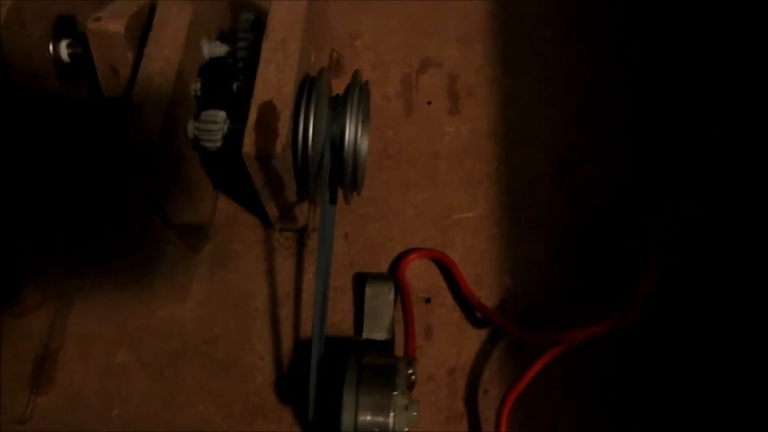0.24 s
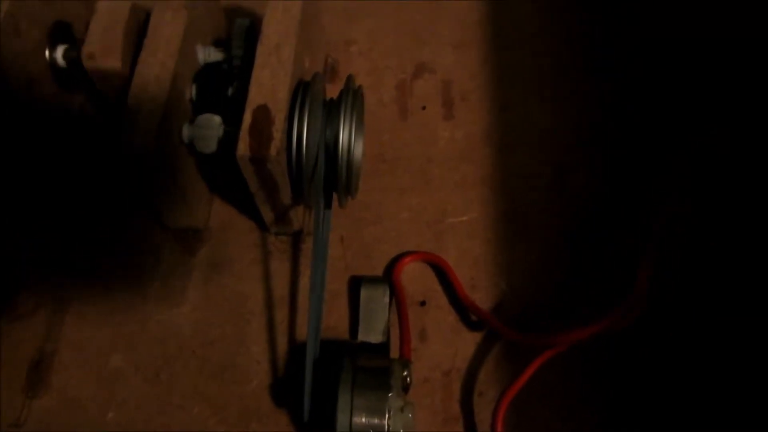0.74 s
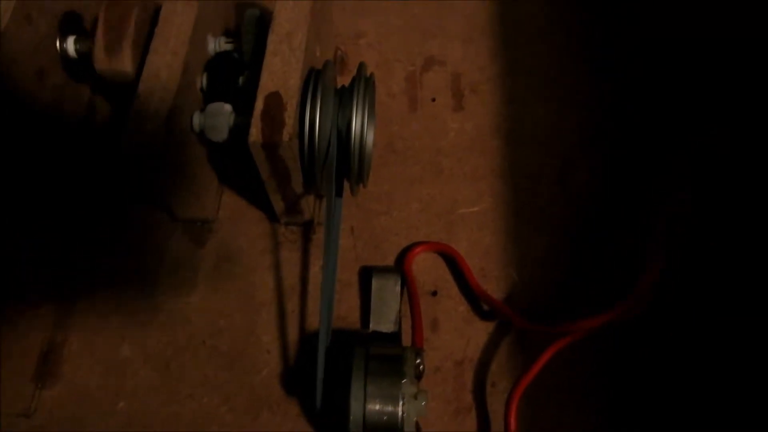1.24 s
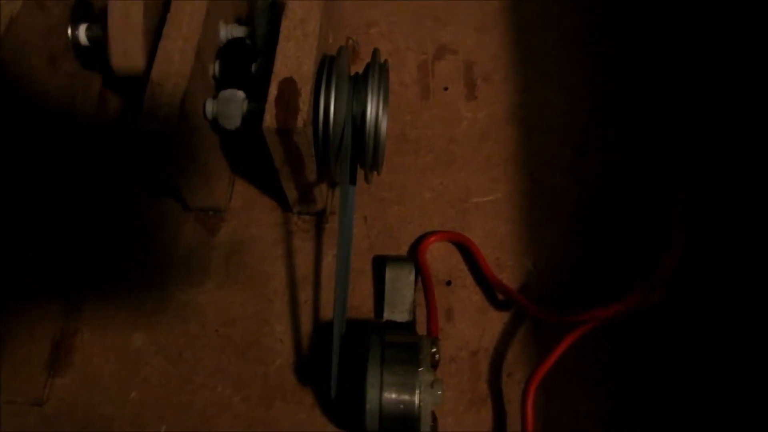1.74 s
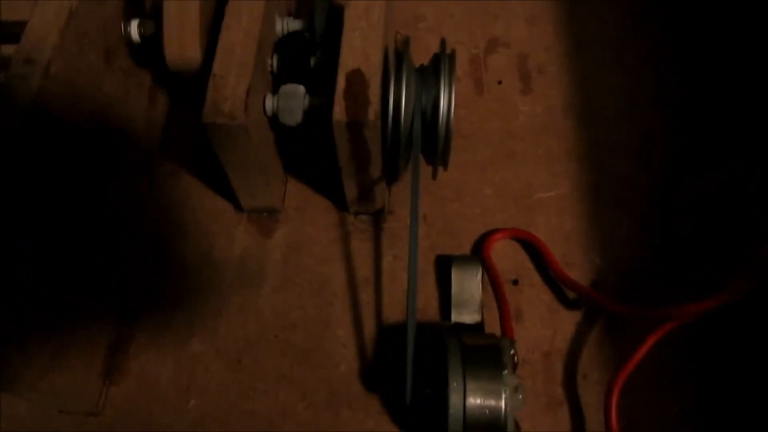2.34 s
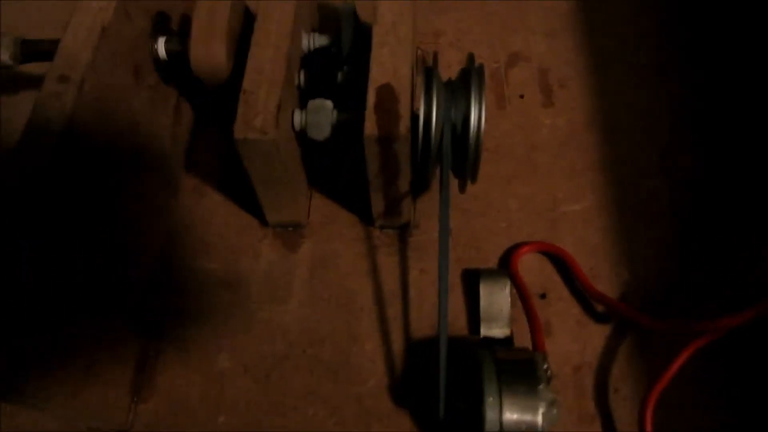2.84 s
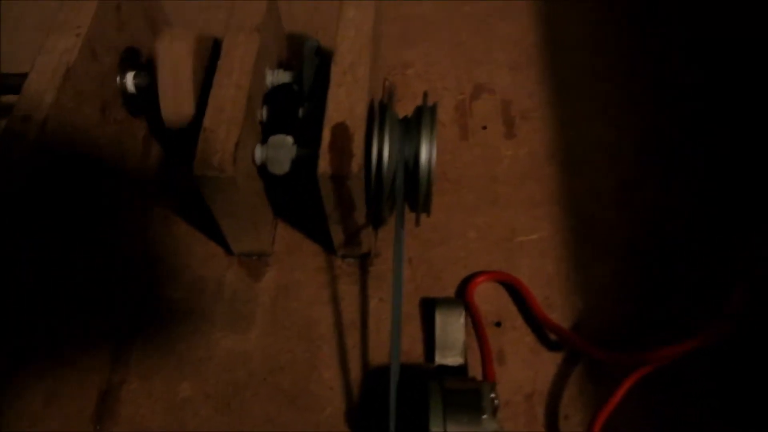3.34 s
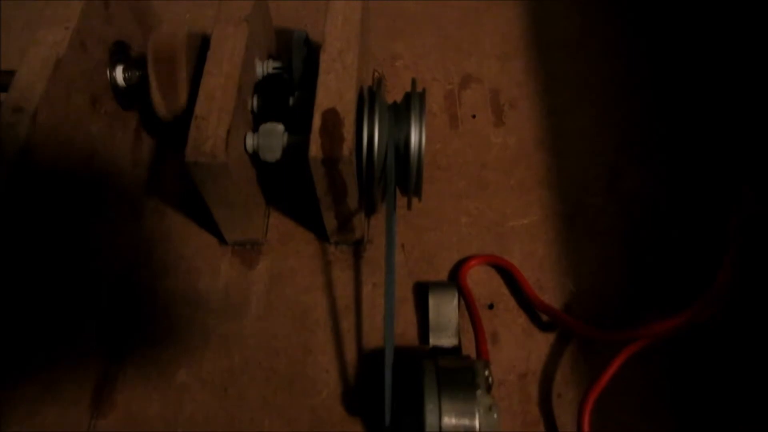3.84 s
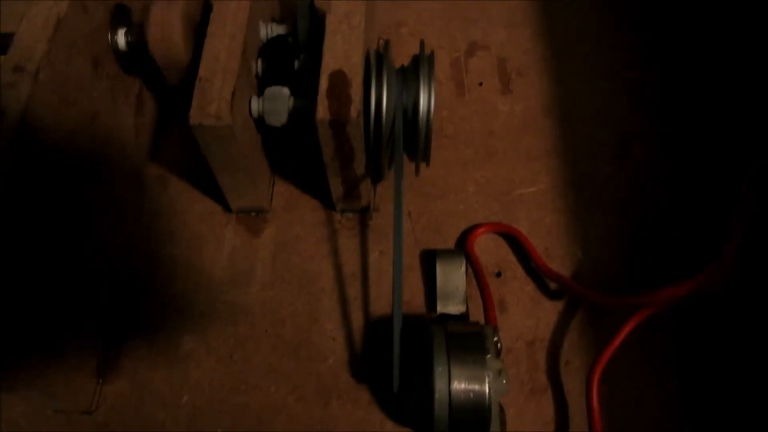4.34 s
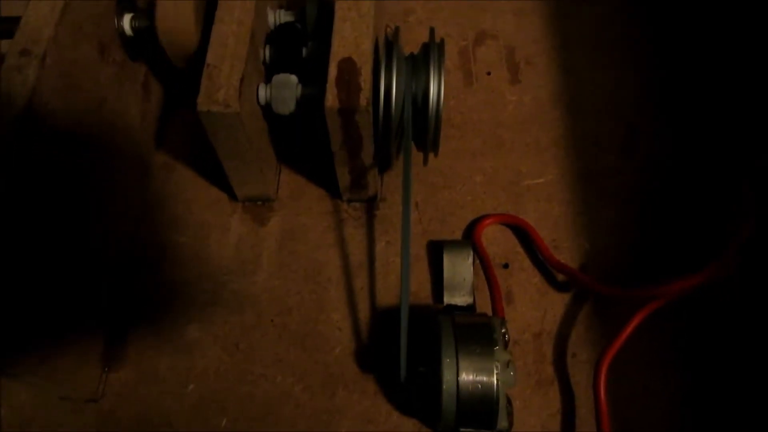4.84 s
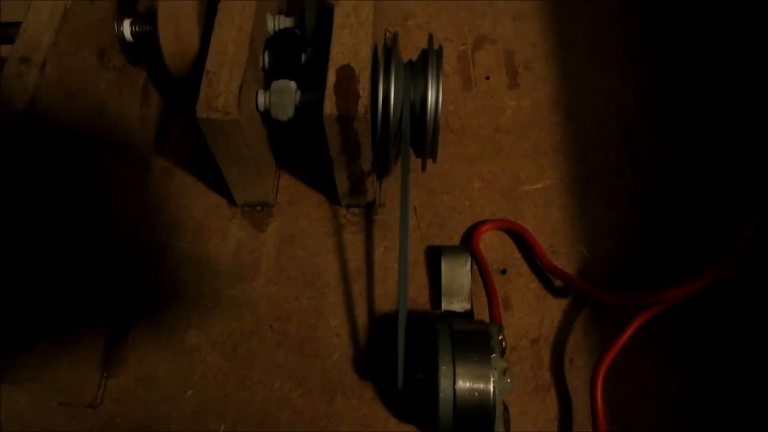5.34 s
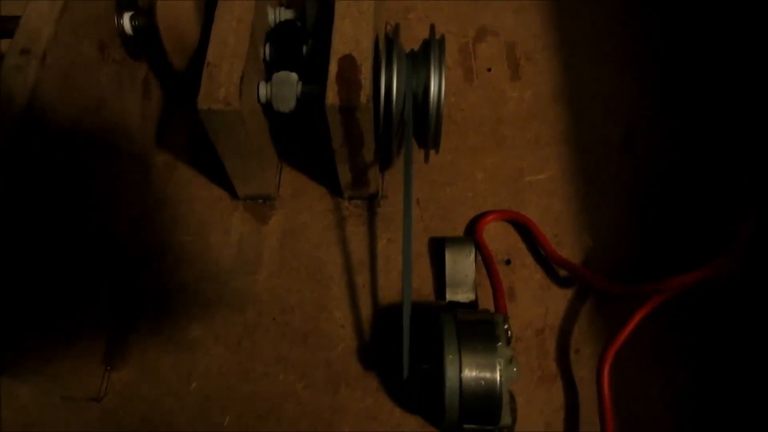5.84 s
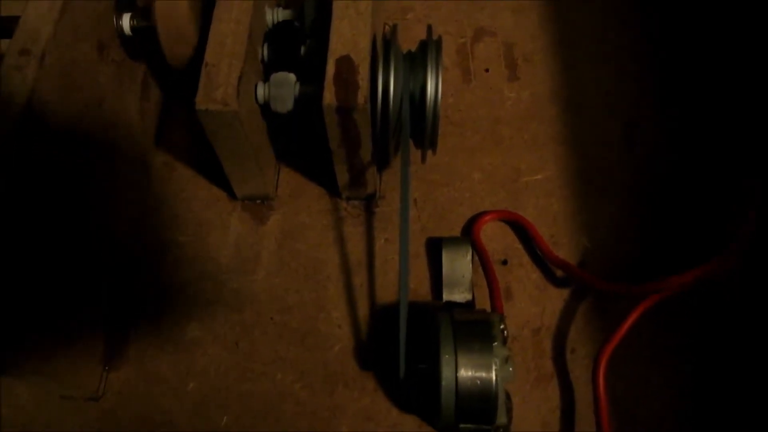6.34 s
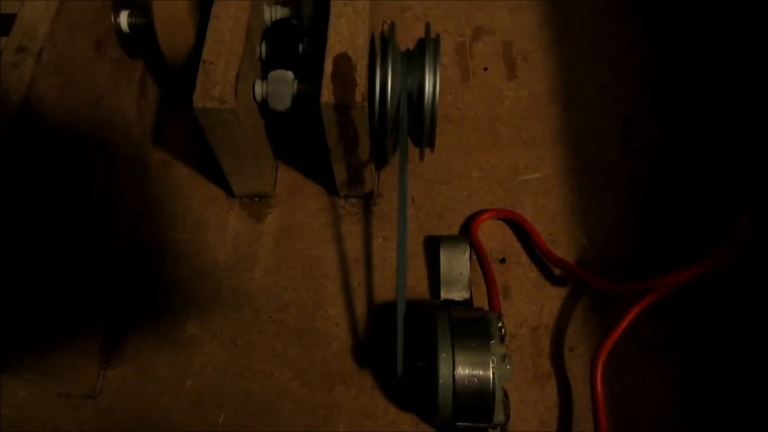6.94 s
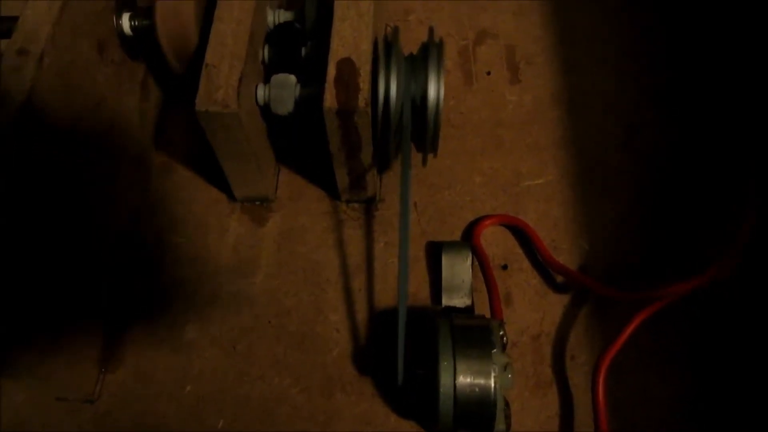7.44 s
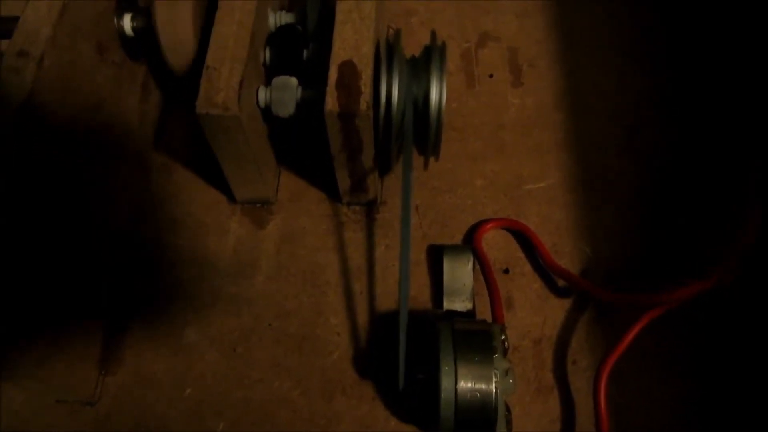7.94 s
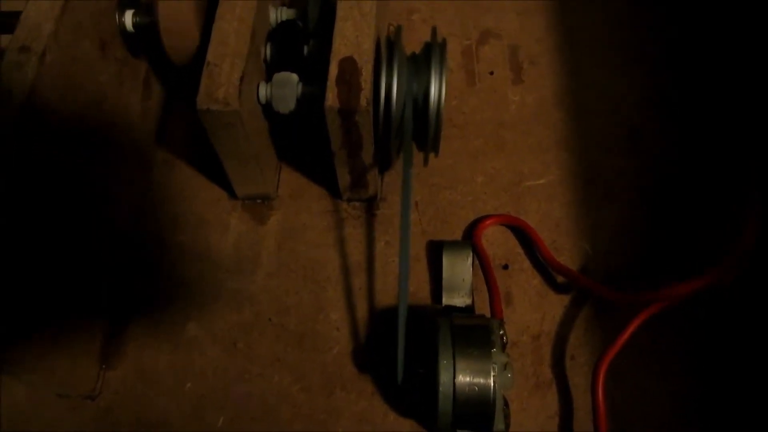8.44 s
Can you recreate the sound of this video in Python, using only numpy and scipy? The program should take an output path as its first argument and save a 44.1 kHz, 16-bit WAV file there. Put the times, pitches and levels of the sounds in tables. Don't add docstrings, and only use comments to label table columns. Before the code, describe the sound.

Close stereo microphone with audible hiss. A thin, wavering high controller whine and a light panel tap come first. At about half a second a small motor starts in jerky knocks, then accelerates without stopping. A wooden board rumbles and buzzes in the midrange, a jar bumps on its rollers, and loose metal ticks with every belt lap, growing into a dense, steady rattling roar that is still running at the end.

```python
import sys
import numpy as np
from scipy import signal
from scipy.fft import rfft, irfft
from scipy.io import wavfile
from scipy.ndimage import uniform_filter1d

SR = 44100
rng = np.random.default_rng(int(sys.argv[2]) if len(sys.argv) > 2 else 0)


def to_wav(s):
    ch = np.atleast_2d(s).T
    pcm = np.round(np.clip(ch, -1, 1) * 32767)
    wavfile.write(sys.argv[1], SR, pcm.astype(np.int16))


def attenuation_scalar(level_db):
    decades = np.asarray(level_db, float) / 20
    return 10 ** decades


N = 383229
T = np.arange(N) / SR

# start_s, peak_db, bright_db
KICKS = [(0.5372, -53, -61), (0.5534, -14, -56), (0.583, -12, -38), (0.6125, -15.5, -57),
         (0.6386, -20, -54), (0.664, -8, -40), (0.7065, -8.5, -39), (0.744, -15, -54), (0.7661, -13, -51),
         (0.8124, -13, -33), (0.8257, -11, -32), (0.88, -17, -47), (0.9014, -20, -40), (0.9284, -26, -52),
         (0.944, -7, -49), (0.9854, -1.5, -35), (1.0057, -12, -33), (1.0431, -23, -52), (1.0755, -16, -49),
         (1.089, -10, -52)]
# start_s, peak_db
KNOCKS = [(1.3393, -8), (1.395, -10), (1.4144, -7.5), (1.5476, -11), (1.6561, -10.5), (1.8666, -17),
          (1.913, -15), (1.9774, -8.5), (2.042, -7), (2.0699, -10), (2.2557, -15), (2.3296, -12.5),
          (2.45, -11), (2.5551, -11), (2.5956, -8), (2.6409, -7), (2.717, -8), (2.802, -12), (2.8654, -10),
          (2.9167, -10), (3.0265, -13), (3.0923, -6), (3.1333, -8), (3.3147, -12), (3.5065, -5),
          (3.5398, -4.5), (3.705, -9), (3.7289, -15), (3.7514, -8), (3.7908, -9), (3.8382, -8), (3.893, -4),
          (3.9339, -3), (3.9993, -5), (4.114, -5), (4.2028, -3), (4.309, -8), (4.3854, -8), (4.4692, -4),
          (4.512, -6), (4.5934, -5.5), (4.7326, -7), (4.79, -8), (4.9491, -9), (5.0704, -7), (5.228, -8),
          (5.342, -9), (5.6745, -8), (5.7299, -8), (5.7713, -8), (6.0831, -8), (6.8204, -9), (7.0527, -7),
          (7.196, -8), (7.3432, -5), (7.5313, -4)]
# start_s, roughness (1 = usual)
LAPS = [(0.72, 0.5), (1.492, 0.46), (2.1, 0.55), (2.677, 0.51), (3.17, 0.45), (3.592, 1.36), (3.974, 1.06),
        (4.282, 0.85), (4.57, 1.26), (4.849, 1), (5.129, 1.4), (5.396, 1.1), (5.641, 1.23), (5.874, 1.15),
        (6.107, 1.08), (6.333, 1.3), (6.551, 1.2), (6.763, 0.91), (6.972, 1.4), (7.169, 0.95), (7.365, 0.9),
        (7.552, 0.4), (7.738, 0.7), (7.9235, 0.6), (8.1085, 1.1), (8.2927, 0.8), (8.4767, 0.69),
        (8.6605, 0.79), (8.844, 1)]
# freq_hz, width_hz, level_db, left_right_db
BOARD = [(440, 36, -35, -.5), (550, 39, -5.5, -0.5), (586.4, 31, -0.5, 0), (612, 28.2, 5.5, 1),
         (714, 46, -2.5, -8)]
# freq_hz, width_hz, level_db, left_right_db
FRAME = [(851, 30, 0.5, 0.35), (999, 110, 0.5, 0.45), (1048.4, 39, 0, 0.33), (1192, 80, -1, 0.44),
         (1336, 79, 4.5, 0.83), (1558, 35, -3.5, 1)]
# freq_hz, width_hz, level_db, left_right_db
BRACKET = [(1765, 100, -0.5, 3), (1915, 120, -3, 1.5), (2218, 60, -9.5, 2.3), (2414, 107, -11.5, 1.7),
           (2534, 40, -17, 1.8), (2680, 36, -11.5, 1.1), (2910, 230, -10, 0.7), (3310, 61, -18.5, 0.65)]
# freq_hz, width_hz, level_db, left_right_db
HOUSING = [(1390, 42, -2.5, 1), (1481, 56, -3.5, 1), (1933, 110, -12, 1), (2950, 200, -19.5, 1),
           (3265, 80, -14, 1)]
# freq_hz, width_hz, level_db, left_right_db
METAL = [(8960, 460, -2.5, -4), (9430, 420, -4.5, -8.5), (10060, 490, -1, -10), (10640, 1700, -2.5, -5),
         (12100, 1200, -11, -6)]
# freq_hz, width_hz, level_db, left_right_db
SHELL = [(3940, 360, -2.5, -0.51), (5130, 440, -5.5, -1.1), (5914, 370, -2.5, -0.51),
         (6230, 380, 0.5, 0.63), (6700, 610, -3.5, -0.67), (7540, 1400, -6.5, -2)]
# freq_hz, width_hz, level_db, left_right_db
BRUSHES = [(8560, 1800, -3, 1), (9940, 130, -3, -6), (10920, 500, 4.5, -4), (12240, 600, 0.5, -18),
           (12900, 300, -5, -10), (13500, 200, -4.5, -9), (14700, 1200, -17, -1)]

PLACES, TURNS_PER_LAP = 4320, 24
ROTOR_EASES_SPEED = 50


def rms_one(x):
    return x / np.sqrt(np.mean(x ** 2) + 1e-20)


def in_time(rows, before_db=None):
    s, *columns = np.transpose(rows)
    return [np.interp(T, s, column, left=before_db) for column in columns]


def drift(rate_hz):
    r = np.exp(-2 * np.pi * rate_hz / SR)
    warm_up = 20000
    noise = rng.standard_normal(N + warm_up)
    return rms_one(signal.lfilter([1], [1, -2 * r, r * r], noise)[warm_up:])


def butterworth(x, order, hz, kind="low"):
    return signal.sosfilt(signal.butter(order, hz, kind, fs=SR, output="sos"), x)


def resonate(x, hz, width_hz):
    r = np.exp(-np.pi * width_hz / SR)
    w = 2 * np.pi * min(hz, .45 * SR) / SR
    return signal.lfilter([0, np.sin(w)], [1, -2 * r * np.cos(w), r * r], x + 1e-18)


def scatter(spread_db):
    strength_db = spread_db * np.minimum(rng.exponential(1, N), 4)
    return attenuation_scalar(strength_db) * rng.choice([-1, 1], N)


def shaft_marks(turns, count):
    return np.diff(np.floor(count * turns), prepend=0) > 0


def contacts(turns, count, per_s):
    return shaft_marks(turns, count), rng.random(N) < per_s / SR, np.arange(N), N


def lap_position():
    s = np.transpose(LAPS)[0]
    return np.interp(T, s, np.arange(len(s)))


def lap_contacts(turns, count, rolling):
    handover_s = 3.17
    lap, handover = lap_position(), round(handover_s * SR)
    by_shaft = lap[handover] + (turns - turns[handover]) / TURNS_PER_LAP
    place = np.floor(PLACES * np.where(T < handover_s, by_shaft, lap)).astype(int)
    new = np.diff(place, prepend=place[0]) > 0
    uneven = rng.random(PLACES) < rolling * TURNS_PER_LAP / PLACES
    even = place % (PLACES // (count * TURNS_PER_LAP)) == 0
    return new & even, new & uneven[place % PLACES], place, PLACES


def lap_swing(speed):
    # lap_share, rattle_db, casing_db, bracket_db, board_db
    spots = [(-.21, 3.5, 4, 4, 2), (-.1, 3, 2, 4.5, 3.5), (0, 0, 1, 1.5, -0.5), (.11, 4, 2, 4.5, 1.5),
             (.28, -2, 1, 0, -2.5), (.42, 0, 0.5, -1, 0)]
    # lap_share, rattle_db, casing_db, bracket_db, board_db
    flaps = [(.25, 0, 0, 4.9, 2.1), (.49, 0, -4, 1.1, 6.3)]
    full_speed, blur_speed = 126., 100
    rise = .5
    lap, swing_db = lap_position(), 0
    roughness, = in_time(LAPS)
    flapping = np.clip((speed - full_speed) / 3, 0, 1)
    width = .024 + .0008 * np.maximum(speed - blur_speed, 0)
    for places, size in (spots, roughness), (flaps, flapping):
        for share, *lift_db in places:
            past = ((lap - share + .5) % 1 - .5) / width + rise
            near = np.exp(-.5 * (past / np.where(past < 0, rise, 2 - rise)) ** 2)
            swing_db = swing_db + np.c_[lift_db] * size * (near - width * np.sqrt(2 * np.pi))
    return swing_db


def body(modes, marks, rate, kick_db, spread_db, apart_db, steady=0., lag=0):
    regular, rolling, place, places = marks
    at = np.flatnonzero(regular | rolling)
    swell = attenuation_scalar(1.36 * drift(74)) / np.sqrt(rate)
    wear = attenuation_scalar(rng.normal(0, 2., len(at)))
    touch = ((attenuation_scalar(kick_db) * regular + rolling) * swell)[at] * wear
    even = (steady * attenuation_scalar(kick_db) * regular / np.sqrt(rate))[at]
    luck, out = scatter(spread_db), np.zeros((2, N))
    for hz, width_hz, level_db, pan_db in modes:
        one, other = [touch * luck[(place[at] + shift) % places] for shift in rng.integers(0, N, 2)]
        clicks = np.zeros((2, N))
        clicks[:, at] = one + even, attenuation_scalar(apart_db) * other
        mid, side = attenuation_scalar(level_db) * np.sqrt(width_hz) * resonate(clicks, hz, width_hz)
        out[0] += attenuation_scalar(pan_db / 2) * (np.roll(mid, lag) + side)
        out[1] += attenuation_scalar(-pan_db / 2) * (mid - side)
    return rms_one(out)


def blows(events, modes, boost_db, contact_s):
    at, out = [round(event[0] * SR) for event in events], np.zeros((2, N))
    peak_db = np.array(events)[:, 1]
    luck_db = rng.normal(0, 1.4, (len(at), len(modes)))
    grit = rng.standard_normal(N)
    fade = np.exp(-1 / (max(contact_s, 1e-5) * SR))
    for k, (hz, width_hz, level_db, pan_db) in enumerate(modes):
        clicks = np.full(N, 1e-18)
        clicks[at] = attenuation_scalar(peak_db + level_db + boost_db + luck_db[:, k])
        envelope = signal.lfilter([np.sqrt(1 - fade ** 2)], [1, -fade], clicks)
        force = envelope * np.roll(grit, 997 * k) + 0.63 * (-1) ** k * clicks
        out += resonate(force, hz, width_hz) * attenuation_scalar([[pan_db / 2], [-pan_db / 2]])
    return out


def wood(turns, speed, effort_db, bracket_swing_db, board_swing_db):
    # freq_hz, width_hz, level_db, left_right_db
    apron_modes = [(322, 38, 0, 0)]
    marks, rate = lap_contacts(turns, count=6, rolling=8), 14 * speed
    asleep = np.clip(1 - speed / 42, 0, 1)
    tuned = np.exp(-((speed - 103) / 26) ** 2)
    settled = np.clip(speed - 124.5, 0, 1)
    board_db = effort_db - 5.5 - 14 * asleep + 2.5 * tuned - 1.8 * settled + board_swing_db
    waking_db = np.interp(T, [.9, 1.3], [-10, 0])
    frame_db = effort_db - 1.5 + waking_db
    bracket_db = effort_db - 12 + 0.0416 * speed + bracket_swing_db + waking_db
    apron_db = effort_db + waking_db - 32.5 - 0.0081 * speed + board_swing_db
    rumble = attenuation_scalar(board_db) * body(BOARD, marks, rate, 0., 2.15, -18)
    rumble += attenuation_scalar(frame_db) * body(FRAME, marks, rate, 0., 1.3, -13.5)
    rumble += attenuation_scalar(bracket_db) * body(BRACKET, marks, rate, 0.81, 4.0, -17.0)
    rumble += rotor(turns, speed, effort_db)
    thin = butterworth(rumble + wood_hits(), 10, 465, "high")
    apron = attenuation_scalar(apron_db) * body(apron_modes, marks, rate, 0., 4.9, -19)
    return butterworth(thin, 3, 3700) + butterworth(apron, 2, [280, 370], "band")


def rotor(turns, speed, effort_db):
    easing_db = 0.03 * np.maximum(speed - ROTOR_EASES_SPEED, 0)
    level_db = np.minimum(effort_db - 0.2, -27.5) - easing_db
    marks = lap_contacts(turns, count=6, rolling=30)
    housing = attenuation_scalar(level_db) * body(HOUSING, marks, 36 * speed, 6., 0.4, -14.5)
    return housing + squeal(shaft_marks(turns, 6) / np.sqrt(speed))


def squeal(kicks):
    lines = sum(resonate(resonate(kicks, hz, 180), hz, 180) for hz in (2960, 3260))
    fading_db = np.interp(T, [1.2, 2, 5.5, 7], [-14, 5.5, 3.5, -9])
    return attenuation_scalar(-47 + fading_db + 1.8 * drift(5)) * rms_one(lines)


def wood_hits():
    # start_s, peak_db
    seam_thumps = [(1.7, -21), (1.955, -21), (2.583, -19), (2.637, -14), (2.75, -12.5), (2.955, -21),
                   (3.03, -16), (3.152, -10.5), (3.192, -15), (3.475, -16), (3.536, -16), (3.624, -13),
                   (3.948, -15), (4.095, -11), (4.188, -13.5), (4.221, -9.5), (4.281, -11), (4.408, -14),
                   (4.482, -15), (4.512, -9), (4.559, -10), (4.598, -14), (4.654, -16), (4.706, -13),
                   (4.735, -14), (4.819, -14), (4.986, -14), (5.043, -14), (5.099, -11), (5.291, -14),
                   (5.376, -12), (5.455, -10), (5.612, -7), (5.662, -9), (5.734, -15), (5.848, -10),
                   (5.895, -8), (6.082, -12), (6.127, -13), (6.309, -10), (6.351, -12), (6.462, -15),
                   (6.527, -11), (6.568, -14), (6.622, -18), (6.676, -14), (6.741, -10), (6.885, -14),
                   (6.925, -13), (7.025, -11), (7.135, -8.5), (7.191, -17), (7.285, -11), (7.324, -13),
                   (7.51, -12), (7.619, -16)]
    # start_s, peak_db
    clanks = [(1.4142, -9), (2.0417, -6), (2.75, -15), (3.54, -10), (6.9376, -8), (7.5327, -7)]
    bumps = [(s, db - min(s, 5)) for s, db in KNOCKS]
    hits = butterworth(blows(seam_thumps, BOARD[1:4], -9., 0.0031), 3, 900)
    hits += blows(KICKS, HOUSING, -16.5, 0.0039)
    hits += blows(clanks, BRACKET[:2], -3.0, .002)
    return hits + blows(bumps, FRAME[1:5] + BRACKET[:6:2], -7.5, 0.0007)


def metal(turns, speed, effort_db, rattle_swing_db, casing_swing_db):
    rattle_db = -45 + 0.96 * (effort_db + 18)
    casing_db = np.minimum(effort_db - 25, -53.5 + 0.06 * speed)
    casing_db = casing_db + 5 + 0.53 * (rattle_db + 47.5) + casing_swing_db
    brush_db = np.minimum(effort_db - 24.5, -46 - 0.1 * np.abs(speed - ROTOR_EASES_SPEED))
    rate = 60 * speed
    marks = contacts(turns, count=1, per_s=rate)
    rattle = attenuation_scalar(rattle_db + rattle_swing_db) * body(METAL, marks, rate, 12.0, 4.2, -4.0, lag=1)
    casing = attenuation_scalar(casing_db) * body(SHELL, marks, rate, 10.8, 2.6, -26)
    brushes = attenuation_scalar(brush_db) * body(BRUSHES, marks, rate, 3., .8, -0.72)
    return butterworth(rattle + casing + brushes + metal_hits(), 2, 3600, "high")


def metal_hits():
    # start_s, peak_db, casing_db
    ticks = [(3.4924, -30, -30), (3.5383, -32, -39), (3.7009, -34, -37), (3.882, -32, -35),
             (3.9623, -26, -40), (4.0591, -30, -34), (4.2172, -25, -33), (4.2771, -27, -40),
             (4.3609, -28, -36), (4.5091, -27, -36), (4.567, -27, -37), (4.5989, -25, -37),
             (4.7396, -34, -39), (4.7884, -27, -36), (4.8448, -28, -40), (4.8772, -26, -38),
             (4.9097, -33, -36), (4.9256, -31, -35), (5.0688, -25, -31), (5.1252, -30, -38),
             (5.1576, -27, -40), (5.205, -29, -31), (5.3402, -25, -33), (5.3916, -30, -40),
             (5.4205, -24, -40), (5.5452, -33, -39), (5.5881, -27, -37), (5.636, -26, -41),
             (5.664, -24, -36), (5.7049, -29, -33), (5.8241, -29, -37), (5.871, -28, -42),
             (5.8984, -28, -42), (6.0566, -28, -36), (6.103, -30, -44), (6.1304, -29, -42),
             (6.329, -26, -39), (6.3549, -28, -37), (6.4971, -32, -38), (6.5465, -28, -42),
             (6.5659, -31, -38), (6.6088, -32, -38), (6.7595, -26, -40), (6.7844, -30, -39),
             (6.9251, -30, -36), (6.9665, -27, -37), (6.9909, -27, -37), (7.1261, -27, -33),
             (7.1895, -29, -36), (7.3212, -26, -35), (7.3826, -28, -38), (7.4963, -28, -36),
             (7.5522, -30, -35), (7.7382, -31, -42), (7.8106, -30, -39), (7.8814, -30, -39),
             (8.0665, -29, -37), (8.2506, -29, -37), (8.4736, -30, -39), (8.504, -28, -33)]
    hits = blows([(s, peak_db) for s, peak_db, casing_db in ticks], METAL[:4], -3.5, 0.00066)
    hits += blows([(s, casing_db) for s, peak_db, casing_db in ticks], SHELL[2:5], 3.6, 0.0009)
    hits += blows([(s, bright_db) for s, peak_db, bright_db in KICKS], METAL + BRUSHES[4:], 1.5, .003)
    return hits + blows(KNOCKS, SHELL[2:4], -22.5, .0015)


def table_hum(turns, speed, effort_db, casing_swing_db, duck_db):
    # freq_hz, width_hz, level_db, left_right_db
    table_modes = [(106, 9, -12, 0), (143, 13, 0, -1), (205, 12, -8, 0)]
    # start_s, end_s, level_db
    spells = [
        (0.502, 1.1, -5.5),
        (2.0, 2.248, 2),
        (2.497, 2.75, 3.5),
        (4.17, 5.7, 1),
        (5.75, 6.9, -6),
        (7.6, 8.69, -3.5),
    ]
    spells_db = sum(db * (T > start) * (T < end) for start, end, db in spells)
    hum_db = -56.5 + .5 * (effort_db + 20) + 0.3 * duck_db + uniform_filter1d(spells_db, size=3000)
    marks = lap_contacts(turns, count=1, rolling=20)
    hum = attenuation_scalar(hum_db + 1) * body(table_modes, marks, 21 * speed, 7, .6, -9, steady=.5)
    legs = sum(rms_one(resonate(rng.standard_normal(N), hz, 9)) for hz in (104, 208))
    hum += attenuation_scalar(-62 + casing_swing_db) * np.clip(5 * (T - 6.9), 0, 1) * legs
    return butterworth(hum, 2, [90, 230], "band")


def steps():
    # start_s, first_hz, last_hz, level_db
    hunting = [(.0, 7210, 6884, -65), (.145, 7172, 7240, -58), (.215, 7194, 6980, -60),
               (.255, 6990, 7160, -64), (.3, 7200, 7300, -90), (.34, 7310, 7240, -60),
               (.42, 7230, 7142, -48), (.508, 6704, 6708, -53), (.575, 6570, 6390, -53),
               (.705, 6500, 6560, -50), (.81, 6900, 6900, -48), (.838, 6480, 6452, -51)]
    # start_s, first_hz, last_hz, level_db, wobble_rad
    loaded = [(.9, 6800, 6750, -50, 2), (.955, 6830, 6790, -48, 2.1), (1.09, 6715, 6598, -48, 1.2),
              (1.3, 6662, 6600, -45, 1), (1.42, 6482, 6510, -44.5, .45), (1.56, 6430, 6345, -50, 1.6),
              (1.76, 6336, 6326, -47, .4), (1.99, 6426, 6486, -43.5, .5), (2.35, 6486, 6440, -43.5, .5),
              (2.55, 6430, 6401, -45.5, .9), (2.76, 6403, 6413, -46.5, .9), (2.99, 6390, 6274, -41.5, .4),
              (3.18, 6286, 6228, -44, .2), (3.36, 6228, 6266, -45.5, .2), (3.52, 6252, 6272, -51, .6),
              (3.66, 6122, 6260, -90, 0), (4.51, 6380, 6354, -46.5, .2), (4.77, 6295, 6275, -46.5, .2),
              (5.16, 6240, 6260, -55, .2), (5.3, 6204, 6204, -99, 0)]
    half_step_s = .01
    rows = [(*row, 0) for row in hunting] + loaded
    ends = [row[0] for row in rows[1:]] + [T[-1]]
    points = []
    for (start, first, last, db, rad), end in zip(rows, ends):
        points.append((start + half_step_s, first, db, rad))
        points.append((end - half_step_s, last, db, rad))
    return in_time(points)


def whine(turns):
    hz, level_db, wobble_rad = steps()
    octave_db = -52 - .017 * np.abs(hz - 6380) + .45 * (level_db + 47)
    octave_db = octave_db - 60 * (T > 3.67)
    phase = 2 * np.pi * np.cumsum(np.abs(hz) + 8 * drift(25)) / SR
    bend = wobble_rad * np.sin(2 * np.pi * 3 * turns)
    gap_db = np.maximum(np.abs(np.gradient(hz)) * SR - 7000, 0) / 300
    tone_level = attenuation_scalar(level_db - gap_db + 1.5 + 1.0 * drift(30))
    octave_level = attenuation_scalar(octave_db - gap_db + 2.5 + 2.2 * drift(12))
    tone = tone_level * np.sin(phase + bend) * attenuation_scalar([[-.5], [.5]])
    octave = octave_level * np.sin(2 * phase + .5 * bend + [[.8], [0]]) * attenuation_scalar([[-7], [0]])
    return np.sqrt(2) * (tone + octave)


def hand():
    # start_s, peak_db
    taps = [
        (0.160, -33.5),
        (0.419, -46),
    ]
    # freq_hz, width_hz, level_db, left_right_db
    panel = [(619, 60, -1, 0), (958, 50, -8, 0), (1184, 60, -2, 0), (1410, 63, 0, 0), (1750, 80, -9, 0)]
    dull_table = [(270, 90, 0, 0), (170, 70, -2, 0)]
    return blows(taps[:1], panel, -4.0, .006) + blows(taps[1:], dull_table, 0., .004)


def hiss():
    # freq_hz, density_db (per Hz)
    spectrum = [(20, -14), (50, -29), (90, -19.5), (400, -21), (1300, -18.5), (5300, -29), (12900, -34),
                (14800, -34)]
    hz, level_db = np.transpose(spectrum)
    bins_hz = np.arange(N // 2 + 1) * SR / N
    shape = attenuation_scalar(np.interp(np.log(bins_hz + 1), np.log(hz), level_db))
    mid, side = irfft(rfft(rng.standard_normal((2, N))) * shape, N)
    noise = attenuation_scalar(-49) * rms_one(mid) + attenuation_scalar(-42) * rms_one(side) * [[1], [-1]]
    noise += attenuation_scalar(np.interp(T, [0, 4, 6], [-56, -57, -62])) * drift(37)
    return noise + np.sqrt(2) * attenuation_scalar([[-80], [-60]]) * np.sin(2 * np.pi * 15734 * T)


def scene():
    # start_s, turns_per_s
    shaft = [(0, 1), (.55, 5.5), (.7, 12), (.9, 26), (1.0, 29.5), (1.3, 39), (1.7, 45), (2.2, 49.2),
             (2.9, 56.4), (3.3, 61.5), (4, 75), (4.4, 86), (5.2, 98), (5.8, 103), (6.5, 113), (7.2, 124),
             (7.7, 129), (8.69, 131)]
    # start_s, level_db
    effort = [(0.5, -73), (0.59, -43.5), (0.82, -26), (1.46, -23), (1.82, -24.5), (2.0, -20.5), (2.44, -23),
              (2.73, -16.5), (2.78, -19.5), (4.03, -16), (5.13, -17.5), (5.5, -15), (6.16, -19),
              (7.02, -16), (7.78, -16.5), (8.69, -16.5)]
    # start_s, level_db
    duck = [(0, -5), (2, -2), (4, -3.5), (5, -7), (8.69, -9)]
    speed, = in_time(shaft)
    turns = np.cumsum(speed * (1 + .013 * drift(6))) / SR
    effort_db, = in_time(effort, -90)
    duck_db, = in_time(duck)
    rattle_swing_db, casing_swing_db, bracket_swing_db, board_swing_db = lap_swing(speed)
    mill = wood(turns, speed, effort_db, bracket_swing_db, board_swing_db)
    mill = mill + metal(turns, speed, effort_db, rattle_swing_db, casing_swing_db)
    mill = mill + table_hum(turns, speed, effort_db, casing_swing_db, duck_db)
    return mill + whine(turns) + hand() + attenuation_scalar(duck_db) * hiss()


def band_limit(x):
    return signal.sosfilt(signal.butter(12, 15790, fs=SR, output="sos"), x)


def record(dry):
    mix = 1.486 * np.tanh(dry / 1.62)
    return band_limit(mix)


dry = scene()
out = record(dry)
to_wav(out)
```